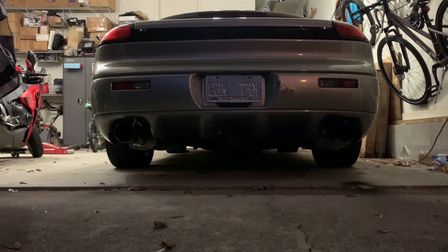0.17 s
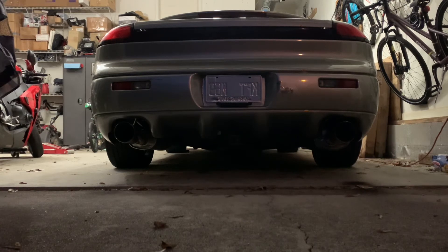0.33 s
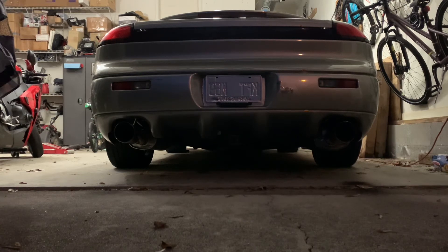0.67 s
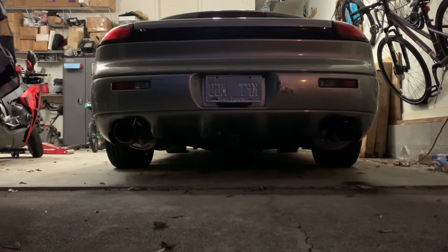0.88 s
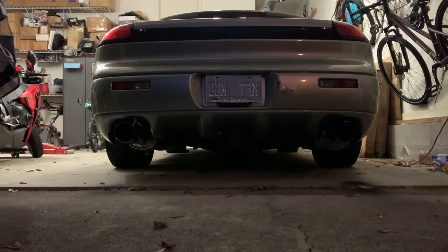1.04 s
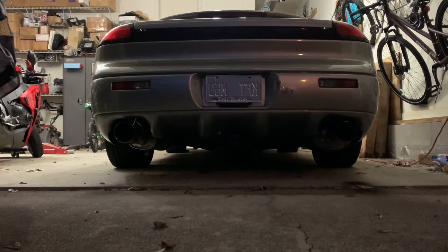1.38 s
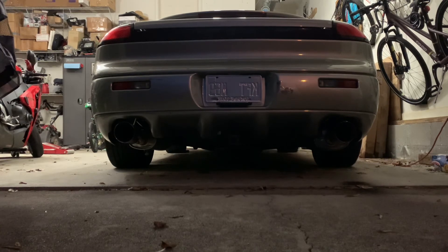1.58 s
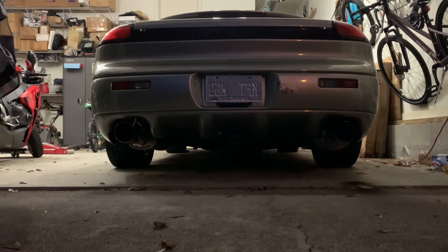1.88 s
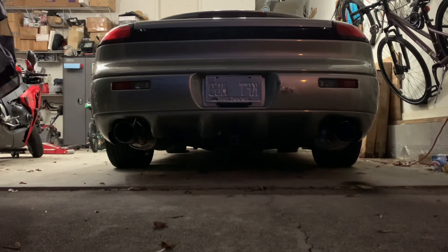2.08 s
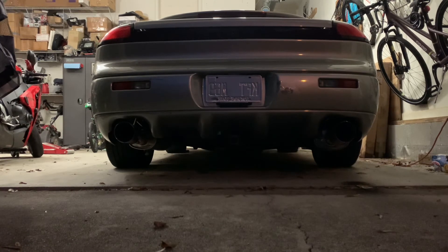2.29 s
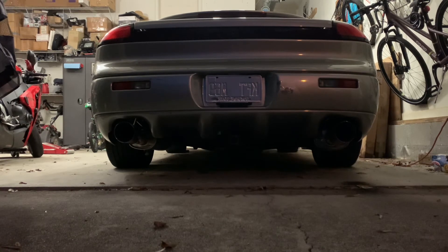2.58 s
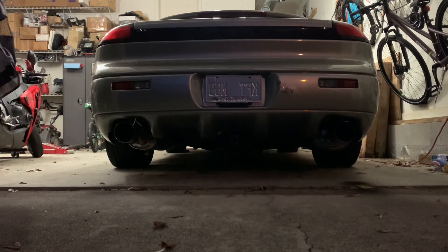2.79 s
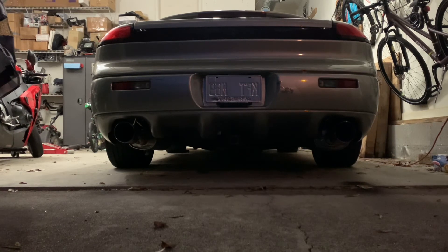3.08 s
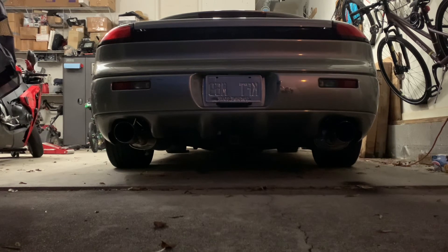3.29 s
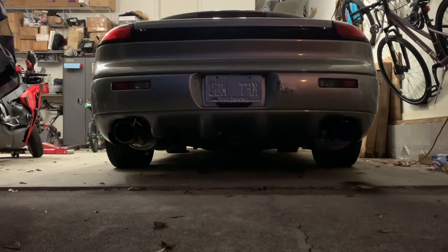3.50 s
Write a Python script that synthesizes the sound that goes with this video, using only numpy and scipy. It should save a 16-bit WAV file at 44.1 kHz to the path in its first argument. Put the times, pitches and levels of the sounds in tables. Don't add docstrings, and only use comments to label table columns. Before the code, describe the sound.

A car engine idles unevenly, its deep exhaust rumble throbbing and burbling close behind the tailpipes.

```python
import sys
import numpy as np
from scipy import signal
from scipy.io import wavfile
from scipy.ndimage import uniform_filter1d, minimum_filter1d

SR = 44100
rng = np.random.default_rng(int(sys.argv[2]) if len(sys.argv) > 2 else 0)


def amp(db):
    return 10 ** (np.asarray(db, float) / 20)


def write(x):
    x = np.atleast_2d(x).T
    wavfile.write(sys.argv[1], SR, np.round(np.clip(x, -1, 1) * 32767).astype(np.int16))


N = 160524

# (time [s], firing rate [1/s])
ENGINE_SPEED = [(0.0, 24.98), (0.25, 27.77), (0.5, 29.71), (0.75, 30.88), (0.9, 32.37), (1.05, 33.45),
                (1.3, 33.48), (1.6, 32.81), (1.9, 31.96), (2.1, 31.93), (2.4, 32.31), (2.6, 30.79),
                (2.8, 29.67), (3.1, 29.57), (3.35, 28.81), (3.64, 27.94)]
# (time [s], strength [dB])
WEAK_FIRINGS = [(.082, -5.5), (.196, -16.5), (.305, -1.5), (.41, -1), (.51, -5.5), (.715, -3), (.84, -4),
                (.992, -6.5), (1.172, -11.5), (1.442, -6.5), (1.564, -6), (1.716, -0.5), (1.902, -7.5),
                (2.027, -3), (2.277, -7.5), (2.401, -11), (2.559, -4.5), (2.688, -9.5), (2.855, -9.5),
                (3.059, -5), (3.195, -5.5), (3.263, -4), (3.333, -1), (3.402, -3), (3.474, -7)]
# (delay [s], level [dB])
THUMP_PATHS = [
    (.002, -1),
    (.016, 4),
    (.054, -3.5),
]
# (frequency [Hz], level [dB], decay t60 [s])
MUFFLER_CHAMBERS = [(74, -57, 0.015), (104, -43, 0.15), (118.6, -41, 0.026), (162.3, -38.5, 0.065),
                    (199, -57, 0.055), (252, -63.5, 0.052)]
# (frequency [Hz], width [Hz], level [dB])
TAILPIPE_RINGS = [(419, 25, 0), (456, 30, -9), (400, 28, -9)]
# (frequency [Hz], density [dB per Hz])
RUSH_SPECTRUM = [(40, 11.5), (150, 4), (210, -13), (330, -7.5), (520, -12.5), (750, -17.5), (1000, -41.5),
                 (1500, -47)]
# (frequency [Hz], density [dB per Hz])
WHIR_SPECTRUM = [(800, -6), (1020, -13.5), (1300, 3.5), (1700, -10), (2500, -8.5), (4000, -16), (6500, -22),
                 (7300, -36)]
# (frequency [Hz], density [dB per Hz])
HISS_SPECTRUM = [(7750, -6), (8000, -1), (8300, 0.6), (10000, -7.5), (11500, -9), (13000, -20),
                 (14600, -35.5)]
# (frequency [Hz], correlation [-1..1])
STEREO_LIKENESS = [(40, 0.9), (180, 0.4), (300, 0.87), (900, 0.72), (1500, 0.62), (2600, -0.55),
                   (4500, -0.25), (9000, 0.22), (11500, 1)]
# (frequency [Hz], level [dB rms])
WHINE_TONES = [(6492, -75), (10207, -80), (12990, -81)]
# (frequency [Hz], level [dB], decay t60 [s])
BAY_PANELS = [(1142, -50, 0.062), (1290, -49, 0.04), (1480, -56.5, 0.13), (1710, -60, 0.023),
              (1896, -53.5, .03), (2330, -63, 0.096), (2717, -61.5, 0.19), (3178, -67, 0.075)]
# (time [s], peak level [dB], centre [Hz])
METAL_TICKS = [
    (0.042, -51, 2820),
    (0.453, -42, 2790),
    (2.512, -43, 4360),
    (2.605, -44, 2900),
    (2.806, -43, 2580),
    (3.002, -39, 3660),
]
# (time [s], peak level [dB], centre [Hz])
DROP_SPITS = [(0.045, -41, 8900), (0.0826, -38, 10100), (0.123, -38.5, 10500), (0.1423, -38, 10400),
              (0.216, -36, 9100), (0.2682, -37, 11500), (0.3071, -37.5, 10100), (0.3894, -42, 9440),
              (0.4588, -37.5, 10800), (0.5467, -37, 10100), (0.709, -40, 10200), (0.7688, -42, 9300),
              (0.8823, -42.5, 8700), (0.945, -35.5, 10050), (1.0918, -40, 8800), (1.216, -43, 8900),
              (1.2709, -39, 9500), (1.394, -43, 8670), (1.4855, -43, 8900), (1.5418, -38, 9200),
              (1.884, -45, 9100), (1.9459, -45.5, 8350), (2.0057, -37.5, 9270), (2.134, -42.5, 8290),
              (2.1639, -42.5, 9070), (2.32, -42, 8260), (2.38, -36.5, 9300), (2.474, -42, 9900),
              (2.508, -38.5, 10500), (2.604, -45, 8110), (2.666, -40, 9760), (2.804, -37, 10800),
              (2.9715, -42, 9100), (3.004, -37.5, 10400), (3.172, -42, 8940), (3.2429, -42, 9300),
              (3.3098, -41, 10200), (3.3777, -36, 9500), (3.561, -54, 8750), (3.595, -37, 9350)]
# (time [s], peak level [dB], frequency [Hz], decay t60 [s])
PIPE_SURGES = [(0.081, -25.5, 410.5, 0.18), (0.267, -18, 442, 0.085), (0.306, -22, 415, 0.091),
               (0.373, -23, 412, 0.16), (0.408, -20, 433, 0.073), (0.474, -15, 413, 0.069),
               (0.578, -14, 414, 0.093), (0.689, -19.5, 433, 0.1), (0.757, -14, 417, 0.153),
               (0.887, -19, 443, 0.15), (0.944, -18, 450, 0.1), (0.99, -13.5, 417, 0.064),
               (1.04, -33, 420, 0.095), (1.081, -19.5, 420.5, 0.13), (1.136, -19, 409, 0.11),
               (1.169, -32, 425, 0.079), (1.217, -22, 413, 0.2), (1.26, -12.5, 419, 0.076),
               (1.314, -13, 409, 0.11), (1.402, -25, 447, 0.22), (1.437, -25, 402, 0.16),
               (1.499, -13, 433, 0.049), (1.53, -16.5, 424, 0.067), (1.606, -32, 398, 0.15),
               (1.685, -19.5, 428, 0.16), (1.715, -17, 408, 0.091), (1.763, -13.5, 422, 0.097),
               (1.802, -20, 371, 0.097), (1.865, -18, 413.6, 0.15), (1.896, -36, 430, 0.095),
               (1.994, -40, 397, 0.046), (2.151, -18, 410, 0.1), (2.272, -14, 433, 0.052),
               (2.336, -17.5, 421, 0.17), (2.367, -18, 406, 0.058), (2.448, -23, 466, 0.13),
               (2.507, -17, 449, 0.12), (2.557, -18, 404, 0.077), (2.621, -24, 414, 0.21),
               (2.65, -25, 412, 0.15), (2.822, -13, 422, 0.11), (3.023, -18, 402, 0.097),
               (3.053, -23, 397, 0.063), (3.157, -25, 439, 0.14), (3.259, -21, 408, 0.086),
               (3.332, -17.5, 409, 0.12), (3.472, -24, 410, 0.14), (3.542, -25.5, 381, 0.2)]
# (time [s], level [dB])
BELT_CHIRPS = [(.075, -49), (0.136, -45), (0.203, -46), (0.414, -41), (.62, -46), (.735, -53), (0.797, -44),
               (1.055, -52), (1.145, -52), (1.298, -52), (1.72, -47), (2.108, -51), (2.66, -53),
               (3.52, -50)]

LEFT_RIGHT = np.array([[1], [-1]])
CRANK_START = -.14
REBOUND = 0.26
THUMP_DB, THUMP_SPREAD_DB, THUMP_JITTER_S = -8, .7, .0002
SOFTEN_HZ, LOW_CUT_HZ, HIGH_CUT_HZ = 69.2, 44.8, 174.1
EXHAUST_PAN_DB = 0.76
PUFF_DB, PUFF_S, PUFF_DELAY_S, PUFF_SPREAD_DB = -31, 0.0054, .008, 2
PUFF_STEADY = 0.29
PUFF_FOLLOWS = 2
PUFF_DB_PER_HZ = 1
RUSH_DB, RUSH_PULSING, RUSH_BASS_CUT, RUSH_BASS_HZ = -16.5, 0.37, .6, 190
WHIR_DB, WHIR_PULSING = -39.5, 0.11
HISS_DB, HISS_PAN_DB, HISS_FADE_DB = -51.5, 2.5, -3.5
PANEL_PATCHY_DB, PANEL_RATE_HZ = 2.5, 25
TICK_T60_S = 0.057
SPIT_T60_S, SPIT_WIDTH, SPIT_DB, SNAP_DB, SNAP_S = 0.17, 0.081, -9.5, -7.5, 0.0035
SPIT_PAN_DB, SPIT_CONTRAST = 5, 1.76
SURGE_LEAD_S, SURGE_SIDE, PIPE_HZ, PIPE_WANDER = .008, 0.69, 417, .5
CHIRP_HZ, CHIRP_S = 3158, 0.008
CEILING, OFFSET, AIR_TOP_HZ = .88, .0044, 13700


def rms_one(x):
    return x / np.sqrt(np.mean(x ** 2) + 1e-20)


def at_hz(points, hz):
    table_hz, values = np.transpose(points)
    return np.interp(np.log(hz), np.log(table_hz), values)


def cut(x, hz, kind, order=2):
    return signal.sosfilt(signal.butter(order, hz, kind, fs=SR, output="sos"), x)


def zero_phase_low(x, hz, order):
    return signal.sosfiltfilt(signal.butter(order, hz, fs=SR, output="sos"), x)


def drift(rate):
    r = np.exp(-80 * np.pi * rate / SR)
    slow = signal.lfilter([1], [1, -2 * r, r * r], rng.standard_normal(N // 40 + 2002))[2000:]
    return np.interp(np.arange(N) / 40, np.arange(len(slow)), rms_one(slow))


def ring(x, hz, t60):
    r = amp(-60 / (t60 * SR))
    w = 2 * np.pi * hz / SR
    return signal.lfilter([0, np.sin(w)], [1, -2 * r * np.cos(w), r * r], x + 1e-18)


def clicks(s, sizes):
    out = np.zeros(N + 2 * SR)
    np.add.at(out, ((s + 1) * SR).astype(int), sizes)
    return out[:N + SR]


def place(out, s, sound):
    start = int(s * SR)
    out[:, start:start + sound.shape[1]] += sound


def banded_noise(spectrum, patchy_db):
    out = 0
    together = drift(0.39)
    lowest, highest = spectrum[0][0], spectrum[-1][0]
    edges = lowest * 2 ** np.arange(0, np.log2(highest / lowest) + .1, 1 / 4)
    white = rng.standard_normal((2, 2, N))
    for k, (low, high) in enumerate(zip(edges, edges[1:])):
        mid, side = cut(white[k % 2], [low, high], "band")
        hz = np.sqrt(low * high)
        alike = np.clip(at_hz(STEREO_LIKENESS, hz), -1, 1)
        gain = amp(at_hz(spectrum, hz) + patchy_db * (1.8 * together + drift(23)))
        out = out + gain * (np.sqrt(1 + alike) * mid + np.sqrt(1 - alike) * side * LEFT_RIGHT)
    return rms_one(out)


def firings():
    t = np.arange(-SR // 4, N + SR // 4) / SR
    turns = np.cumsum(np.interp(t, *np.transpose(ENGINE_SPEED))) / SR
    turns += CRANK_START - turns[SR // 4]
    s = np.interp(np.arange(np.ceil(turns[0]), turns[-1]), turns, t)
    db = np.zeros(len(s))
    for weak_s, weak_db in WEAK_FIRINGS:
        k = np.argmin(abs(s - weak_s))
        db[k:k + 2] = weak_db, -REBOUND * weak_db
    return s, db


def thumps(s, db):
    steps = 0
    for delay, path_db in THUMP_PATHS:
        at = s + delay + THUMP_JITTER_S * rng.standard_normal(len(s))
        spread_db = THUMP_SPREAD_DB * rng.standard_normal(len(s))
        steps = steps - clicks(at, amp(db + path_db + spread_db))
    rounded = cut(steps, SOFTEN_HZ, "low", order=1)
    out = cut(rounded, [LOW_CUT_HZ, HIGH_CUT_HZ], "band", order=4)
    for hz, chamber_db, t60 in MUFFLER_CHAMBERS:
        out = out + amp(chamber_db - 19.0) * ring(steps, hz, t60)
    return amp(THUMP_DB) * rms_one(cut(out, 43.3, "high")[SR:])


def gas_flow(s, db):
    r = np.exp(-1 / (PUFF_S * SR))
    speed_db = PUFF_DB_PER_HZ / np.gradient(s)
    sizes = amp(PUFF_FOLLOWS * db + speed_db + PUFF_SPREAD_DB * rng.standard_normal(len(s)))
    puffs = clicks(s + PUFF_DELAY_S - PUFF_S, sizes)
    flow = signal.lfilter([1], [1, -2 * r, r * r], puffs)[SR:]
    return flow / flow.mean()


def tailpipe(flow):
    air = rng.standard_normal((2, N)) * (PUFF_STEADY + flow)
    air[1] = 0.56 * air[0] + 0.64 * air[1]
    rings = 0
    for hz, width, db in TAILPIPE_RINGS:
        t60 = 1.6 / width
        rings = rings + amp(db) * rms_one(ring(ring(air, hz, t60), hz, t60))
    return amp(PUFF_DB) * rms_one(rings)


def gas_rush(flow):
    rush = amp(RUSH_DB) * banded_noise(RUSH_SPECTRUM, patchy_db=0.0)
    rush = rush * (1 + RUSH_PULSING * (flow - 1))
    return rush - RUSH_BASS_CUT * zero_phase_low(rush, RUSH_BASS_HZ, order=4)


def engine_whir(flow):
    pulsing = 1 + WHIR_PULSING * (np.roll(flow, 200) - 1)
    return amp(WHIR_DB) * banded_noise(WHIR_SPECTRUM, patchy_db=.8) * pulsing


def belt_hiss():
    fade_db = HISS_FADE_DB * np.minimum(np.arange(N) / SR / 3.1, 1)
    air = cut(banded_noise(HISS_SPECTRUM, patchy_db=1.1), 7900, "high", order=8)
    return amp(HISS_DB + fade_db + HISS_PAN_DB * LEFT_RIGHT) * air


def whines():
    air = rng.standard_normal((2, N))
    air[1] = 0.67 * air[0] + 0.87 * air[1]
    out = np.zeros((2, N))
    for hz, db, t60 in BAY_PANELS:
        out += amp(db + PANEL_PATCHY_DB * drift(PANEL_RATE_HZ)) * rms_one(ring(air, hz, t60))
    for hz, db in WHINE_TONES:
        out += amp(db) * rms_one(ring(air[0], hz, 0.1))
    return out


def ticks():
    out, t = np.zeros((2, N + SR)), np.arange(SR // 10) / SR
    for s, db, hz in METAL_TICKS:
        air = rms_one(cut(rng.standard_normal((2, len(t))), [hz * .8, hz * 1.2], "band"))
        place(out, s, amp(db - 60 * t / TICK_T60_S) * air)
    return out[:, :N]


def spits():
    out, t = np.zeros((2, N + SR)), np.arange(SR // 4) / SR
    for s, db, hz in DROP_SPITS:
        air = rng.standard_normal((2, len(t)))
        band = [hz * (1 - SPIT_WIDTH), hz * (1 + SPIT_WIDTH)]
        tail = rms_one(cut(air[0], band, "band")) * amp(SPIT_DB - 60 * t / SPIT_T60_S)
        snap = rms_one(cut(air[1], [8300, 12000], "band")) * amp(SNAP_DB) * np.exp(-t / SNAP_S)
        pan_db = SPIT_PAN_DB * (10000 / hz) ** 3
        level_db = -37 + SPIT_CONTRAST * (db + 37)
        place(out, s, amp(level_db + pan_db / 2 * LEFT_RIGHT) * (tail + snap))
    return out[:, :N]


def surges():
    out, t = np.zeros((2, N + SR)), np.arange(SR // 5) / SR
    chances = rng.standard_normal((len(PIPE_SURGES), 2))
    for (s, db, hz, t60), (turn, lag) in zip(PIPE_SURGES, chances):
        fall = np.log(1000) / t60
        tone_hz = PIPE_HZ + PIPE_WANDER * (hz - PIPE_HZ)
        phase = 2 * np.pi * tone_hz * t + np.pi * turn + SURGE_SIDE * (lag - 1) * LEFT_RIGHT / 2
        swell = fall * t * np.exp(1 - fall * t)
        place(out, s - SURGE_LEAD_S, amp(db) * swell * np.sin(phase))
    return out[:, :N]


def chirps():
    out, t = np.zeros((2, N + SR)), np.arange(SR // 10) / SR
    for s, db in BELT_CHIRPS:
        tone = np.sqrt(2) * np.sin(2 * np.pi * CHIRP_HZ * t + rng.uniform(0, 6, (2, 1)))
        place(out, s, amp(db) * t / CHIRP_S * np.exp(1 - t / CHIRP_S) * tone)
    return out[:, :N]


def scene():
    s, db = firings()
    flow = gas_flow(s, db)
    exhaust = thumps(s, db) + tailpipe(flow) + gas_rush(flow) + surges()
    engine_bay = engine_whir(flow) + belt_hiss() + whines() + chirps()
    return amp(EXHAUST_PAN_DB * LEFT_RIGHT) * exhaust + engine_bay + ticks() + spits()


def low_pass(x):
    return signal.sosfilt(signal.butter(12, 14500, fs=SR, output="sos"), x)


def record(dry):
    need = np.minimum(1, CEILING / (abs(dry).max(axis=0) + 1e-9))
    gain = uniform_filter1d(minimum_filter1d(need, size=501), size=501)
    dry = cut(dry, AIR_TOP_HZ, "low", order=8)
    bass = zero_phase_low(dry, 700, order=2)
    return low_pass(dry - (1 - gain) * bass + OFFSET)


dry = scene()
out = record(dry)
write(out)
```